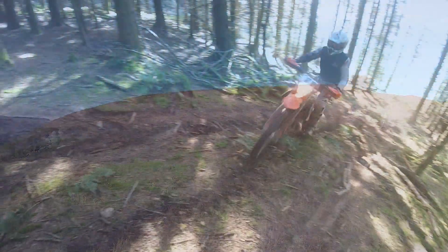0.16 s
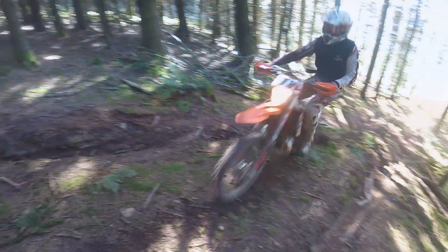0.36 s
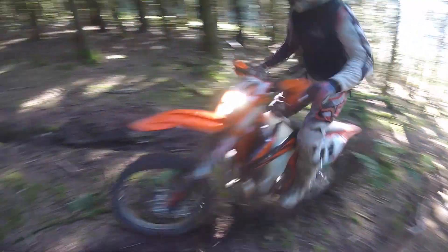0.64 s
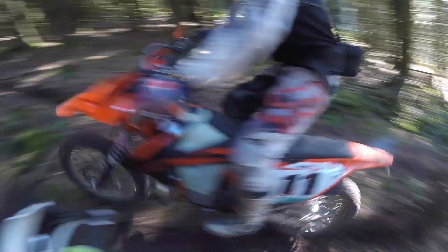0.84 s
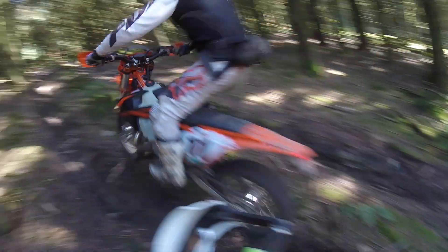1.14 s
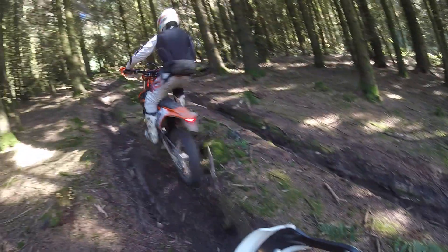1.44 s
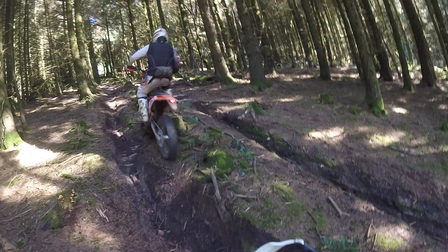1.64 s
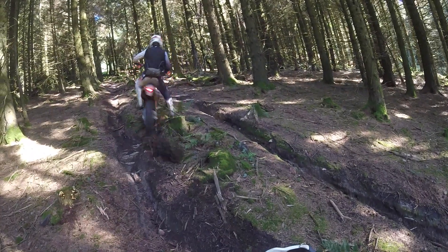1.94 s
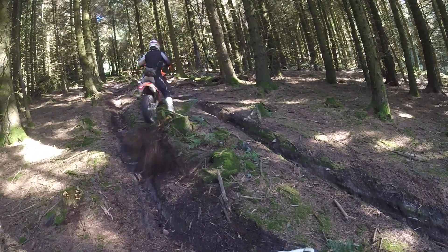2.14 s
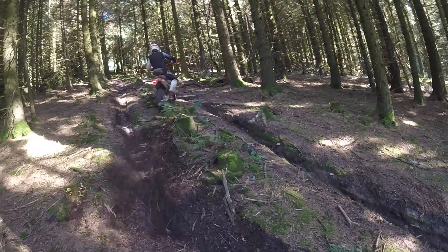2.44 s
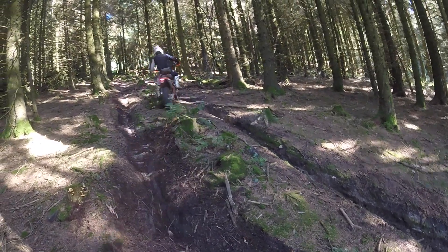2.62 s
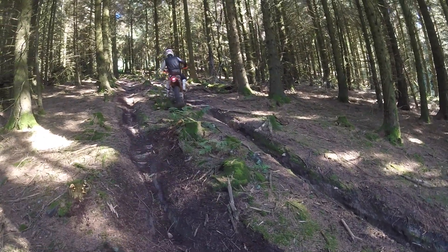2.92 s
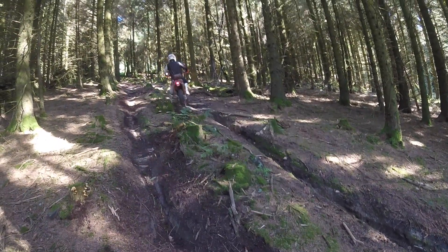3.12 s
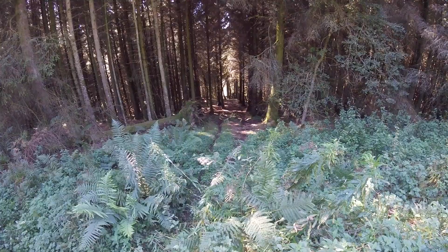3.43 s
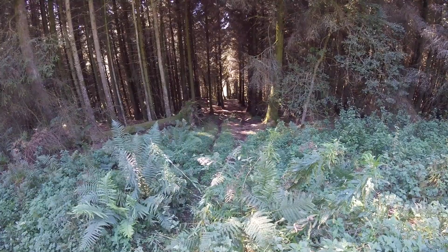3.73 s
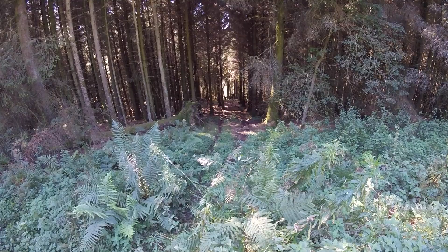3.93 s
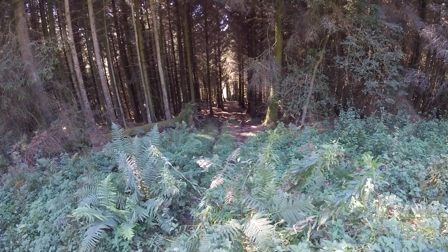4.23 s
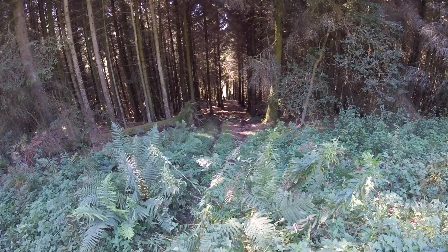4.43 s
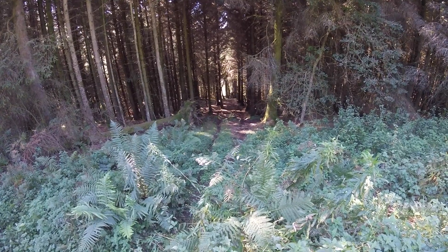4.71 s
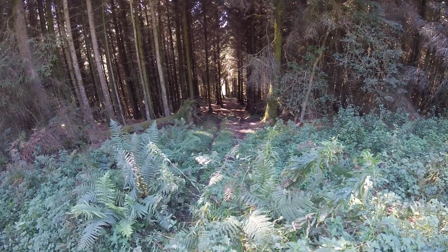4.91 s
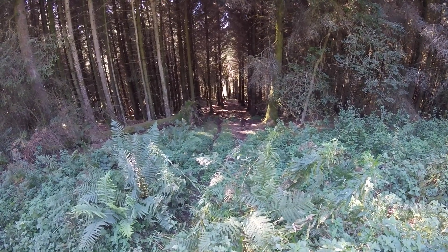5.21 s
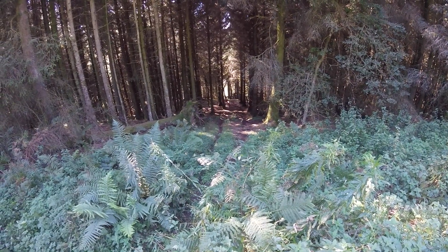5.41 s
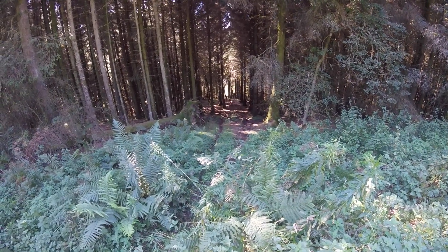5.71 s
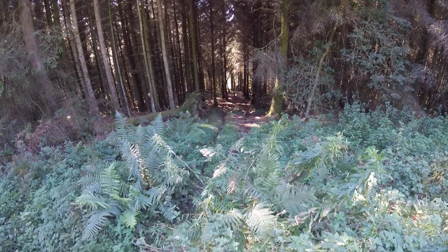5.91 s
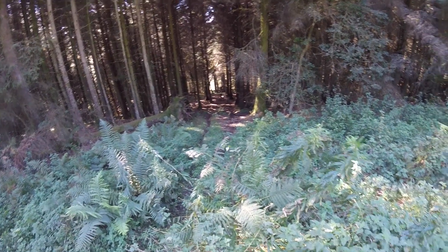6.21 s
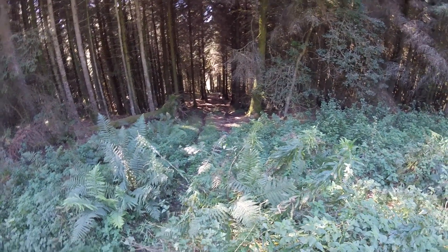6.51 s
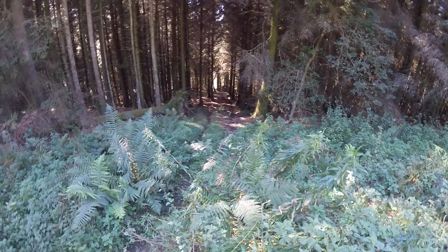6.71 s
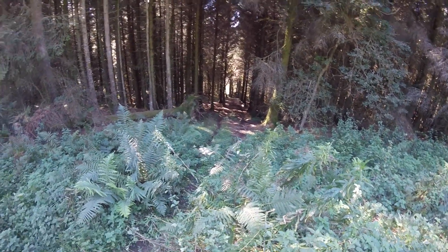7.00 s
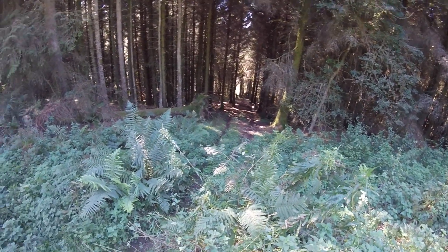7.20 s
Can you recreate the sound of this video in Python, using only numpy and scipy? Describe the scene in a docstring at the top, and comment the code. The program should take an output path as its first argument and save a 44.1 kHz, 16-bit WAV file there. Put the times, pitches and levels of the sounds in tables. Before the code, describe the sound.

A two-stroke dirt bike passes within arm's reach of the microphone, buzzing and booming, then blips up a forest climb and sputters with the throttle shut while another engine ticks over softly nearby. An abrupt change brings a much quieter bike deep among trees, blipping, joined by one throaty growl, then growing louder and revving hard with a bright metallic ring.

```python
"""Two-stroke enduro bikes on a forest trail. One passes within arm's reach, blips up a climb and sputters with
the throttle shut, while another ticks over close by. The scene then changes abruptly to a bike among the trees,
which grows louder and revs hard, its thin steel expansion chamber ringing; early on another bike growls once.
Each engine is a train of clicks, one per firing, that drives filtered pulses and bursts of noise. Moving air, a
soft murmur of distant engines and a fine hiss of leaves lie under it all."""
import sys
import numpy as np
from scipy import signal
from scipy.fft import rfft, irfft
from scipy.io import wavfile
from scipy.ndimage import uniform_filter1d, minimum_filter1d

SR = 44100
rng = np.random.default_rng(int(sys.argv[2]) if len(sys.argv) > 2 else 0)


def unload_wav(signal):
    """Save mono or channel-first audio to the path in sys.argv[1] as 16-bit WAV at rate SR, clipped to [-1, 1]."""
    wavfile.write(
        sys.argv[1],
        SR,
        np.round(np.clip(np.atleast_2d(signal).T, -1, 1) * 32767).astype(np.int16),
    )


N = 324135

# Colour of the near bike's gas rasp. Each row: pitch in Hz, relative strength in dB per Hz.
NEAR_RASP_COLOUR = [(200,-11.5),(600,7),(900,2),(1300,0),(1700,-7),(2000,-5.5),(2400,-3),(2800,-9.5),(3600,-16),(4300,-17.5),(5500,-48)]
# Colour of its hiss, also used for the spit of the pops. Each row: pitch in Hz, relative strength in dB per Hz.
NEAR_HISS_COLOUR = [(2060, -19.5), (3500, -2.5), (4330, -6.5), (5300, -2.5), (5910, -5.5), (6360, -12.5),
                    (8890, -16.5), (10200, -20), (11500, -32.5), (13900, -37), (15000, -48)]
# Extra unevenness with the throttle fully shut: strength in dB, timing as a share of the firing rate.
MISFIRE_DB, MISFIRE_JITTER = 5, .04


def near_bike():
    """Exhaust note, with gas rasp and mechanical hiss beating at the firing rate."""
    rate, throttle, thump_db, boom_db, bark_db, rasp_db, hiss_db = near_controls()
    # a two-stroke fires unevenly with the throttle shut
    starved = (1 - throttle) ** 2
    jitter = .004 + MISFIRE_JITTER * starved
    clicks = firings(rate, jitter, uneven_db=.6 + MISFIRE_DB * starved)
    pops, filled = overrun()
    # a pop takes the place of the plain stroke
    exhaust = near_exhaust(clicks, rate, thump_db - 3 * filled, boom_db - 8 * filled, bark_db - 11 * filled)
    rasp_puffs = puffs(clicks, decay_s=0.0033, steady=3.9)
    rasp = from_db(rasp_db + 5.5) * even(colour(rasp_puffs, NEAR_RASP_COLOUR))
    hiss_puffs = puffs(clicks, decay_s=0.0074, steady=1.3)
    hiss = from_db(hiss_db + 2.5) * even(colour(hiss_puffs, NEAR_HISS_COLOUR))
    buffet = from_db(thump_db - 21.5) * rms_one(band(rng.standard_normal(N), 22, 54, order=2))
    bike = exhaust + pops + pipe_wall(clicks, rasp_db) + rasp + hiss + near_chamber(clicks, rate)
    return forest(bike, t60=.6, wet_db=-23) + buffet


# Engine speed while passing, then climbing. Each row: time in seconds, firings per second.
PASSING_REVS = [(0.0, 45), (0.114, 43.3), (0.2, 41.7), (0.276, 53.6), (0.462, 46.8), (0.548, 59.4),
                (0.618, 49.9), (0.726, 54), (0.988, 49.3), (1.108, 49.3), (1.224, 52.4), (1.386, 46.3),
                (1.514, 44.8), (1.6, 46.6)]
CLIMBING_REVS = [(1.61, 49.05), (1.658, 56), (1.866, 61.5), (1.988, 71.97), (2.094, 60.4), (2.224, 54.22),
                 (2.384, 56.7), (2.452, 69.6), (2.544, 82.5), (2.636, 92.85), (2.704, 87.1), (2.786, 74.1),
                 (2.864, 57.2), (2.952, 45.21), (3.034, 38.55), (3.116, 39.06), (3.198, 52.46),
                 (3.35, 52.92)]
# Twists of the throttle. Each row: second it is fully open, second it starts to shut, opening from 0 to 1.
THROTTLE_TWISTS = [(0, 0.11, 0.46), (0.104, .22, 0.69), (0.229, 1.27, 0.99), (1.296, 1.473, 0.71),
                   (1.627, 1.936, 0.95), (2.161, 2.183, 0.27), (2.268, 2.29, 0.56), (2.374, 2.745, 0.91),
                   (2.821, 3.13, 0.65), (3.15, 3.22, 0.62), (3.296, 3.35, 0.4)]
# Which side faces the listener. Each row: time in seconds, side (0 ahead, 1 beside, 2 behind, 3 uphill).
SIDE_FACING = [(0, 0), (.45, 0), (.55, 1), (1.25, 1), (1.42, 2), (1.98, 2), (2.25, 3), (3.35, 3)]
# One row each for thump, boom, bark, rasp and hiss.
# Each row: relative level in dB heard from ahead, beside, behind and uphill.
VOICE_LEVELS = [(-11.5, -16.5, -12, -12.5), (-20, -9.5, -8.5, -2.5), (-16.5, -15.5, -16.5, -17),
                (-29.5, -30, -29, -32), (-35, -32, -30, -33.5)]
# Same five rows. Each row: dB lost with the throttle shut, dB gained per doubling of revs,
# dB lost per doubling of distance (a minus sign turns gain into loss and loss into gain).
VOICE_RESPONSES = [(12, -6, -0.63), (24.8, -1.5, 2), (17.9, 8, 1.06), (8.05, 10.5, 3.5), (10.1, -1, 5)]
OPEN_S, SHUT_S = 0.027, 0.13   # full travel of the throttle
PASS_S, CLOSEST_M, SPEED_M_PER_S = 0.46, 0.9, 5.83
PULLING_REVS = 50   # firings per second above which revs change the levels


def near_controls():
    """Firing rate, throttle and voice levels, which follow throttle, revs, distance and the side that faces us."""
    t = np.arange(N) / SR
    rate, = in_time(PASSING_REVS + CLIMBING_REVS)
    view, = in_time(SIDE_FACING)
    throttle = np.zeros(N)
    for opened, shut, opening in THROTTLE_TWISTS:
        travel = np.maximum((opened - t) / OPEN_S, (t - shut) / SHUT_S)
        throttle = np.maximum(throttle, opening - np.maximum(travel, 0))
    # both counted in doublings
    revs = np.log2(np.maximum(rate / PULLING_REVS, 1))
    distance = np.log2(np.hypot(1, SPEED_M_PER_S * (t - PASS_S) / CLOSEST_M))
    levels = []
    for sides, (shut_db, revs_db, distance_db) in zip(VOICE_LEVELS, VOICE_RESPONSES):
        side_db = np.interp(view, np.arange(len(sides)), sides)
        levels.append(side_db - shut_db * (1 - throttle) + revs_db * revs - distance_db * distance)
    return rate, throttle, *levels


# Exhaust colour heard from each side of the bike. Each row: pitch in Hz, relative strength in dB.
AHEAD_COLOUR = [(20,-17),(50,-19),(100,-6),(150,-17),(200,2),(250,12.5),(300,4),(400,0),(510,-13.5),(600,-6.5),(720,-21),(930,-15.5),(1350,-43.5),(2200,-53.5)]
BESIDE_COLOUR = [(20,-18),(50,-22.5),(100,-16.5),(150,-12.5),(210,7.5),(250,3.5),(330,-7.5),(400,-10),(520,-23.5),(610,-17.5),(770,-30.5),(910,-19.5),(1150,-47.5),(1500,-28.5),(2200,-64.5)]
BEHIND_COLOUR = [(20,-34),(50,-3),(110,3),(190,-10),(240,-12),(320,-10),(430,0),(570,-9.5),(660,-11),(740,-13),(950,-21.5),(1280,-45),(1450,-22.5),(2200,-60)]
UPHILL_COLOUR = [(20,-65),(50,1),(85,3.5),(170,0.5),(280,-10),(380,-3.5),(470,-6.5),(550,9),(640,-4),(800,-18),(950,-39),(1250,-34),(2200,-56)]
# Lag of the echo off the ground. One number each in seconds: ahead, beside, behind, uphill.
GROUND_LAG_S = [0.00509, 0.00476, 0.00434, 0.00539]
# The honk of the pipe. Each row: pitch in Hz, width in Hz, strength in dB.
PIPE_HONK = [(366, 61, 3)]
HONK_REVS, HONK_SPAN_REVS = 75.5, 8.4   # firings per second: where it honks most, and how far around that


def near_exhaust(clicks, rate, thump_db, boom_db, bark_db):
    """Pressure pulses ring in the pipe; its colour turns as the bike goes by."""
    view, = in_time(SIDE_FACING)
    turbulence = np.interp(view, [0, 1], [.3, .12])
    pulses = disperse(rms_one(clicks)) + turbulence * puffs(clicks, decay_s=0.011, steady=0.95)
    # the bounce off the uneven ground shifts as the bike moves
    lag_s = np.interp(view, np.arange(len(GROUND_LAG_S)), GROUND_LAG_S) + 0.00042 * drift(4)
    bounce = band(pulses, 236, 3000, order=2)
    pulses = pulses + 0.64 * np.interp(np.arange(N) - lag_s * SR, np.arange(N), bounce)
    pulses = muffle(forest(pulses, t60=.4, wet_db=-14))
    # blend from one side's colour to the next
    pipe = 0
    for k, side in enumerate([AHEAD_COLOUR, BESIDE_COLOUR, BEHIND_COLOUR, UPHILL_COLOUR]):
        pipe = pipe + np.maximum(1 - abs(view - k), 0) * rms_one(colour(pulses, side))
    honking = np.exp(-((rate - HONK_REVS) / HONK_SPAN_REVS) ** 2)
    pipe = pipe + honking * resonate(pipe, PIPE_HONK)
    # split by pitch so that each voice has its own level
    low = signal.sosfiltfilt(signal.butter(4, 145, fs=SR, output="sos"), pipe)
    high = signal.sosfiltfilt(signal.butter(4, 330, "high", fs=SR, output="sos"), pipe)
    thump = from_db(thump_db - 3.5) * even(low)
    boom = from_db(boom_db - 1.0) * even(pipe - low - high)
    bark = from_db(bark_db + 0.9) * even(high)
    return thump + boom + bark


# Lone firings as the throttle shuts or first opens. Each row: time in seconds, relative level in dB.
LONE_POPS = [(1.636, -10), (2.011, -9), (2.265, -10.5), (2.283, -7.5), (2.301, -11), (2.373, -7),
             (2.856, -5.5), (2.876, -9.5), (2.934, -7.5), (2.957, -6.5), (2.979, -10.5), (3.029, -9.5),
             (3.054, -11), (3.08, -10.5), (3.106, -10.5), (3.133, -6), (3.157, -8), (3.217, -4.5)]
# Colour of a pop. Each row: pitch in Hz, relative strength in dB.
POP_COLOUR = [(20,-8),(50,0.5),(100,2),(180,-7),(240,-6.5),(400,-14),(540,-6.5),(700,-19.5),(950,-36.5),(2200,-56)]


def overrun():
    """Unburnt charge fires in lone pops. Returns their sound and the moments that they fill."""
    clicks = np.zeros(N)
    for s, db in LONE_POPS:
        clicks[round(s * SR)] = from_db(db)
    bangs = rms_one(clicks) + 0.36 * puffs(clicks, decay_s=.005, steady=0)
    pops = muffle(colour(bangs, POP_COLOUR))
    # the silencer rings on after each bang
    pops = resonate(pops, [(234, 59.5, 6.55), (553, 186, 8.2)]) - pops
    spit = from_db(-63.5) * rms_one(colour(puffs(clicks, decay_s=0.006, steady=0), NEAR_HISS_COLOUR))
    # each pop fills about 39 ms, mostly after it, with soft edges
    free = minimum_filter1d(1. - (clicks > 0), size=1700, origin=200)
    filled = uniform_filter1d(1 - free, size=200)
    return from_db(2.5) * clicks.max() * pops / abs(pops).max() + spit, filled


# Tones of the pipe wall. Each row: pitch in Hz, width in Hz, relative strength in dB.
PIPE_WALL_TONES = [(634, 32, 1.5), (896.8, 110, -2), (1443, 124, -11.5)]


def pipe_wall(clicks, rasp_db):
    """Each firing sets the wall of the pipe ringing on the same few tones, heard from close beside it."""
    view, = in_time(SIDE_FACING)
    beside = np.clip(1 - 0.9 * abs(view - 1), 0, 1)
    ringing = resonate(disperse(clicks), PIPE_WALL_TONES)
    return beside * from_db(rasp_db + 6.0) * rms_one(muffle(ringing))


# Bright ring of a steel expansion chamber, shared with the far bike at full throttle.
# Each row: pitch in Hz, relative strength in dB per Hz.
OPEN_RING_COLOUR = [(2060, -31), (3500, -11.5), (4360, -14.5), (4950, 0.5), (5170, 0), (5560, -7.5),
                    (6020, -6.5), (6510, -10.5), (7540, -12), (8570, -19.5), (10000, -21), (11200, -33),
                    (11800, -46), (13600, -37), (15000, -52)]
# The ring has this level at this many firings per second and climbs steeply with revs.
POWER_BAND_REVS, POWER_BAND_DB, POWER_BAND_DB_PER_OCT = 89.3, -41.5, 35


def near_chamber(clicks, rate):
    """The steel expansion chamber rings louder with revs, so it stands out only towards the top."""
    level_db = POWER_BAND_DB + POWER_BAND_DB_PER_OCT * np.log2(rate / POWER_BAND_REVS)
    gas = puffs(clicks, decay_s=0.0066, steady=1.8)
    return from_db(level_db) * even(colour(gas, OPEN_RING_COLOUR))


# Colour of the far exhaust. Each row: pitch in Hz, relative strength in dB.
FAR_EXHAUST_COLOUR = [(70,-2),(120,-14),(150,5),(210,4.5),(280,1.5),(350,-7.5),(460,-10),(600,-16.5),(700,-21),(850,-14.5),(1200,-23)]
# Colours of its rasp, and of its ring with little throttle. Each row: pitch in Hz, relative strength in dB per Hz.
FAR_RASP_COLOUR = [(410, -29), (700, -8.5), (818, 1), (986, -4.5), (1290, 3.5), (1420, 2.5), (1930, 2.5),
                   (2050, -1.5), (2250, -5), (2930, -7.5), (3190, -21), (3680, -12), (4290, -18.5),
                   (4500, -9.5), (5850, -51), (9900, -120)]
FAR_RING_COLOUR = [(2060, -19.5), (3500, -7), (4380, -16), (4550, -9), (4830, 1), (5140, -0.5), (5590, -7),
                   (6130, -8.5), (6630, -16.5), (7910, -20.5), (9330, -19.5), (10100, -23), (11900, -39),
                   (14200, -37), (15000, -30)]
# Resonances of the expansion chamber. Each row: pitch in Hz, width in Hz, relative strength in dB.
CHAMBER_TONES = [(844, 48, -3), (1415, 66, -32), (1980, 290, 1), (2896, 84, 6), (3660, 70, -19),
                 (5300, 140, 2), (5910, 67, 8.5), (6800, 170, -17), (7050, 36, -11), (7640, 99, -1),
                 (7630, 53, -13)]


def far_bike():
    """The low note carries through the trees, the rasp comes scattered; the chamber rings brighter at full throttle."""
    rate, boom_db, bark_db, rasp_db, ring_db = far_controls()
    throttle = np.clip((ring_db + 40.0) / 14, 0, 1)
    # the faster it turns, the more evenly it fires
    clicks = firings(rate, jitter=.024 * (rate.min() / rate) ** 1.3, uneven_db=2.6 - throttle)
    pulses = disperse(rms_one(clicks))
    boom = forest(pulses + .25 * puffs(clicks, decay_s=.006, steady=.6), t60=.5, wet_db=-9)
    bark = forest(pulses + .55 * puffs(clicks, decay_s=.006, steady=.6), t60=.6, wet_db=-1)
    boom = band(colour(boom, FAR_EXHAUST_COLOUR), 128, 316.5, order=6)
    bark = band(colour(bark, FAR_EXHAUST_COLOUR), 338, 867)
    exhaust = from_db(boom_db - 1.2) * even(boom) + from_db(bark_db + 1.5) * even(bark)
    rumble = throttle * from_db(-61) * rms_one(band(rng.standard_normal(N), 25.07, 110.3, order=2))
    # under load, clean strokes join the hissing gas that drives the steel
    drive = puffs(clicks, decay_s=.003, steady=.6) + .6 * throttle * pulses
    scattered = rms_one(forest(drive, t60=1.0, wet_db=5)) * from_db(2.2 * drift(25))
    steel = scattered + .5 * resonate(scattered, CHAMBER_TONES)
    closed_ring = rms_one(colour(steel, FAR_RING_COLOUR))
    open_ring = rms_one(colour(steel, OPEN_RING_COLOUR))
    ring = (1 - throttle) * closed_ring + throttle * open_ring
    rasp = from_db(rasp_db + 0.83) * even(colour(steel, FAR_RASP_COLOUR))
    return exhaust + rumble + rasp + from_db(ring_db + 1.16) * even(ring)


# The far bike between blips. Each row: time in seconds, firings per second, relative level of its low note in dB.
FAR_CRUISE = [(3.4, 48, -44.5), (4.05, 44.5, -41.5), (4.52, 45.4, -46.5), (4.97, 52.6, -33),
              (5.15, 53, -36.5), (5.45, 68, -33), (6.1, 64, -32.5), (6.36, 70, -30.5), (7.35, 77.3, -34)]
# Its blips of throttle. Each row: second of the top, firings per second there, spin-up in octaves per second,
# spin-down in octaves per second, surge of the low note in dB.
FAR_BLIPS = [(3.79, 67, 4.73, 2, 7.5), (4.19, 50.3, 1.5, 2, 3.5), (4.34, 60.6, 2.6, 3, 6),
             (5.279, 61, 2.3, 2, 6.5), (5.57, 77, 0.71, 2.3, .3), (5.77, 81.6, 4.9, 3.2, 3.5),
             (5.95, 74, 2.93, 2.5, -1), (6.22, 68, 1.25, 2, 1), (6.43, 94, 3.5, 2, -1),
             (6.52, 163, 8.3, 2.7, 12), (6.77, 171, 3.2, 3.2, 10.5), (6.97, 148, 1.3, 4.6, 7.5),
             (7.25, 86, 1, 1.5, 5.5)]
# Its brighter voices. Each row: time in seconds, relative level of the rasp in dB, of the treble ring in dB.
FAR_BRIGHTNESS = [(3.4, -60.5, -57), (3.66, -47, -49.5), (3.83, -43, -53), (3.96, -47.5, -56),
                  (4.3, -49, -59), (4.38, -45.5, -54), (4.52, -43, -54), (4.69, -56, -60.5),
                  (4.96, -51, -59.5), (5.03, -44.5, -53.5), (5.42, -43, -45), (5.97, -37.5, -44),
                  (6.07, -42.5, -47), (6.38, -36.5, -42), (6.52, -25.5, -25.5), (7.03, -28.5, -24.5),
                  (7.17, -33.5, -41), (7.35, -35.5, -32.5)]
SURGE_LEAD_S, SURGE_S = 0.011, 0.1   # the surge comes just before the top and is this wide
BARK_FOLLOWS_RASP, BARK_OFFSET_DB = 0.55, 0.27   # the bark lies between low note and rasp
FLYWHEEL_S = .04   # the flywheel smooths the revs over this time


def far_controls():
    """Each blip spins the engine up and swells its low note; then the revs sink back to the cruise."""
    t = np.arange(N) / SR
    rate, boom_db = in_time(FAR_CRUISE)
    for top_s, top_rate, spin_up, spin_down, surge_db in FAR_BLIPS:
        octaves_below = np.maximum((top_s - t) * spin_up, (t - top_s) * spin_down)
        rate = np.maximum(rate, top_rate * 2 ** -octaves_below)
        boom_db = boom_db + surge_db * np.exp(-((t - top_s + SURGE_LEAD_S) / SURGE_S) ** 2)
    rasp_db, ring_db = in_time(FAR_BRIGHTNESS)
    bark_db = BARK_OFFSET_DB + boom_db + BARK_FOLLOWS_RASP * (rasp_db - boom_db)
    return uniform_filter1d(rate, size=int(FLYWHEEL_S * SR)), boom_db, bark_db, rasp_db, ring_db


# A steel ring on the far bike. Each row: loudest second, width in seconds, pitch there in Hz, level there in dB.
STEEL_SWELLS = [(3.929, 0.19, 4920, -53), (4.469, 0.13, 5040, -48.5), (5.251, 0.1, 4800, -52)]
SING_SAG_HZ_PER_S = 510


def singing_steel():
    """A narrow, grainy ring that swells and fades while its pitch sags."""
    t, out = np.arange(N) / SR, 0
    grain = band(rng.standard_normal(N), 13, 140, order=2)
    for s, width_s, hz, db in STEEL_SWELLS:
        pitch_hz = hz - SING_SAG_HZ_PER_S * (t - s)
        tone = np.sin(2 * np.pi * np.cumsum(pitch_hz) / SR)
        swell = np.exp(-((t - s) / width_s) ** 2)
        out = out + from_db(db) * swell * rms_one(grain * tone)
    return out


# Clatter of a bike waiting beside the listener. Each row: pitch in Hz, relative strength in dB per Hz.
IDLE_COLOUR = [(300,-22), (700,0), (1050,-2), (1300,-2.5), (1520,-1), (1760,-5.5), (2020,-2.5), (2300,-9),
               (2900,-14), (4200,-21.5), (5200,-16.5), (6500,-24.5), (10000,-36), (12000,-48.5)]
IDLE_PER_S, IDLE_DB = 27, -38.5   # firings per second, level


def idling_bike():
    """Soft, steady clatter of an engine ticking over: noise that puffs at each slow firing."""
    clicks = firings(np.full(N, IDLE_PER_S), jitter=0.033, uneven_db=1.0)
    return from_db(IDLE_DB) * rms_one(colour(puffs(clicks, decay_s=0.011, steady=3.0), IDLE_COLOUR))


# Growl of a bike still deeper in the trees. Each row: pitch in Hz, relative strength in dB per Hz.
GROWL_COLOUR = [(250,-28), (450,6), (600,1.5), (850,0), (1150,-4), (1550,-3), (2000,-19), (2800,-37)]
# second of the top, rise and fall in seconds, level at the top in dB, firings per second
GROWL_S, GROWL_RISE_S, GROWL_FALL_S, GROWL_DB, GROWL_PER_S = 4.48, 0.27, 0.17, -39.5, 80


def deepest_bike():
    """One throaty swell, its pitch blurred by uneven firing and noise."""
    since = np.arange(N) / SR - GROWL_S
    swell = np.exp(-(since / np.where(since < 0, GROWL_RISE_S, GROWL_FALL_S)) ** 2)
    clicks = firings(np.full(N, GROWL_PER_S), jitter=0.037, uneven_db=4.0)
    strokes = puffs(clicks, decay_s=0.0056, steady=0.97)
    return from_db(GROWL_DB) * swell * rms_one(colour(strokes, GROWL_COLOUR))


def forest_air():
    """A faint rumble of moving air, a soft murmur of distant engines and a fine hiss of leaves, each a band of
    noise."""
    rumble = from_db(-66.5) * rms_one(band(rng.standard_normal(N), 25, 140, order=2))
    murmur = from_db(-54.0) * rms_one(band(rng.standard_normal(N), 500, 1900, order=3))
    leaves = from_db(-63.5) * rms_one(band(rng.standard_normal(N), 4400, 9600, order=2))
    return rumble + murmur + leaves


def firings(rate, jitter, uneven_db):
    """One click per firing, each a little different in time and strength."""
    count = .9 + np.cumsum(rate * (1 + jitter * drift(50))) / SR
    return np.diff(np.floor(count), prepend=0) * from_db(uneven_db * drift(120))


def puffs(clicks, decay_s, steady):
    """Turbulent gas: a burst of noise dies away after each click, over a steady flow."""
    burst = rms_one(signal.lfilter([1], [1, -np.exp(-1 / (decay_s * SR))], clicks + 1e-18))
    return rms_one((burst + steady) * rng.standard_normal(N))


# Stretches of pipe that hold the pulse back. Each row: pitch in Hz, width in Hz.
PIPE_STRETCHES = [(130, 92), (300, 87), (450, 78), (600, 61), (880, 100), (1450, 100)]


def disperse(x):
    """The pipe delays some pitches more than others, so a sharp pulse leaves it as a short wavelet."""
    for hz, width in PIPE_STRETCHES:
        r = np.exp(-np.pi * width / SR)
        poles = [1, -2 * r * np.cos(2 * np.pi * hz / SR), r * r]
        # all-pass: the reversed poles keep every pitch equally loud
        x = signal.lfilter(poles[::-1], poles, x + 1e-18)
    return x


def muffle(x):
    """The silencer's packing takes the treble out of each pulse."""
    return signal.sosfilt(signal.butter(6, 1800, fs=SR, output="sos"), x)


def forest(x, t60, wet_db, count=500):
    """Hundreds of trunks each send back a small echo, weaker on average the later it comes."""
    delay, size = rng.uniform(.006, 1, count), rng.standard_normal(count)
    echoes = np.zeros(SR + 1)
    echoes[(delay * SR).astype(int)] = size * from_db(-60 * delay / t60)
    return x + from_db(wet_db) * signal.fftconvolve(x, echoes / np.linalg.norm(echoes))[:N]


def resonate(x, modes):
    """Parallel resonances of (Hz, width in Hz, dB)."""
    out = 0
    for hz, width, db in modes:
        r = np.exp(-np.pi * width / SR)
        poles = [1, -2 * r * np.cos(2 * np.pi * hz / SR), r * r]
        out = out + from_db(db) * (1 - r * r) / 2 * signal.lfilter([1, 0, -1], poles, x)
    return out


def colour(x, spectrum, size=8192):
    """Causal (minimum-phase) filter with the given spectrum."""
    hz, db = np.transpose(spectrum)
    grid = np.maximum(np.arange(size // 2 + 1) * SR / size, 1)
    cepstrum = irfft(np.log(from_db(np.interp(np.log(grid), np.log(hz), db))))
    # folding the cepstrum forward makes the filter respond only after its input
    cepstrum[1:size // 2] *= 2
    cepstrum[size // 2 + 1:] = 0
    return signal.oaconvolve(x, irfft(np.exp(rfft(cepstrum))))[:N]


def band(x, low_hz, high_hz, order=3):
    """Butterworth band-pass."""
    edges = [low_hz, min(high_hz, .45 * SR)]
    return signal.sosfilt(signal.butter(order, edges, "band", fs=SR, output="sos"), x + 1e-18)


def even(x):
    """Hold the power near 1 over a few firings, keeping the single pulses."""
    power = uniform_filter1d(uniform_filter1d(x ** 2, size=2200), size=1800)
    return x / np.sqrt(np.maximum(power, 0) + 1e-5 * np.mean(x ** 2))


def drift(rate):
    """Smooth chance of spread 1 that changes so many times a second."""
    knots = rng.standard_normal(8000)
    return rms_one(np.interp(np.arange(N) / SR * rate, np.arange(len(knots)), knots))


def in_time(rows):
    """Each column of a curve table, sample by sample."""
    s, *columns = np.transpose(rows)
    return [np.interp(np.arange(N) / SR, s, c) for c in columns]


def rms_one(x):
    """Scale to unit power."""
    return x / np.sqrt(np.mean(x ** 2) + 1e-20)


def from_db(db):
    """Decibels to gain."""
    return 10 ** (np.asarray(db) / 20)


CHANGE_S = 3.36


def scene():
    """The close pass, then the approach through the trees, over the same forest air."""
    first = np.clip((CHANGE_S - np.arange(N) / SR) / 0.0064 + .5, 0, 1)
    close = near_bike() + idling_bike()
    distant = far_bike() + singing_steel() + deepest_bike()
    return (first * close + (1 - first) * distant + forest_air())[None]


CUTOFF_HZ = 15200


def record(dry):
    """The highest peaks are rounded and the top is cut."""
    rounded = dry / (1 + (dry / .95) ** 8) ** (1 / 8)
    return signal.sosfilt(signal.ellip(10, .1, 80, CUTOFF_HZ, fs=SR, output="sos"), rounded)


dry = scene()
out = record(dry)
unload_wav(out)
```